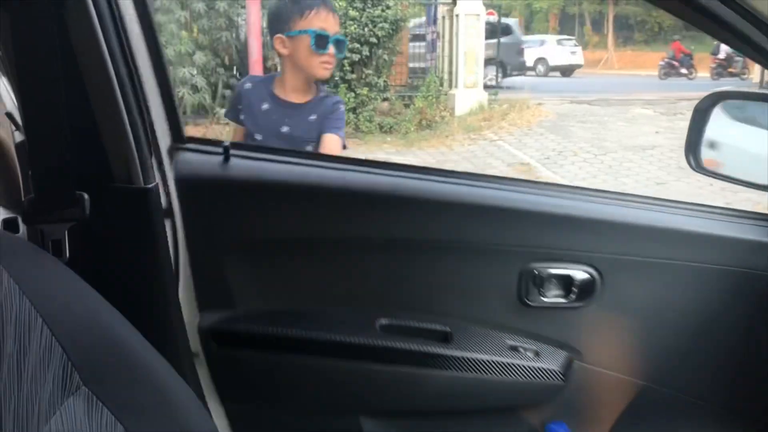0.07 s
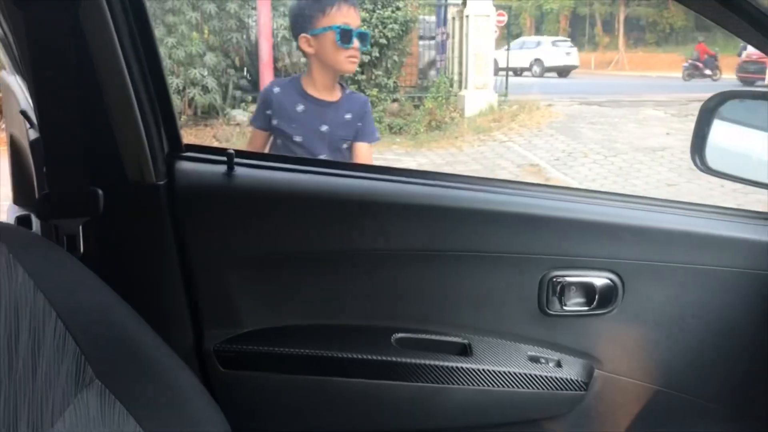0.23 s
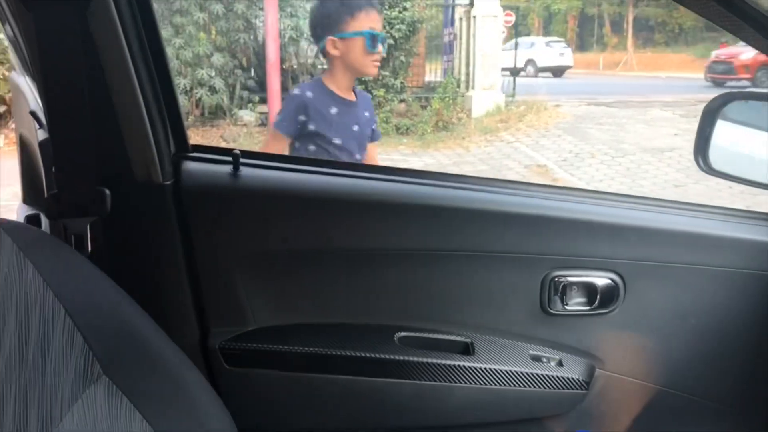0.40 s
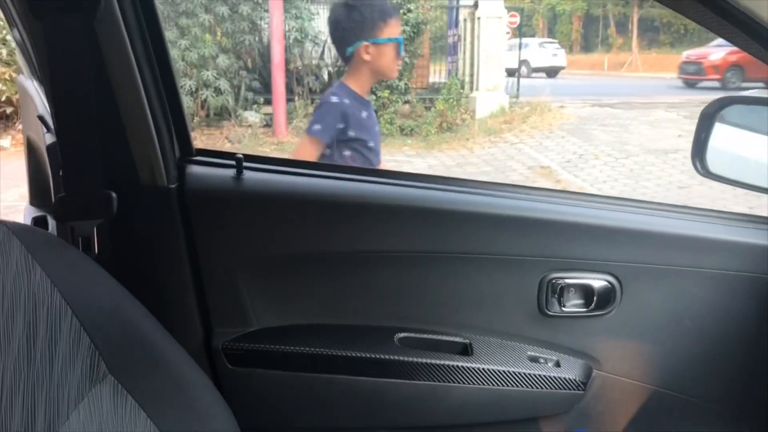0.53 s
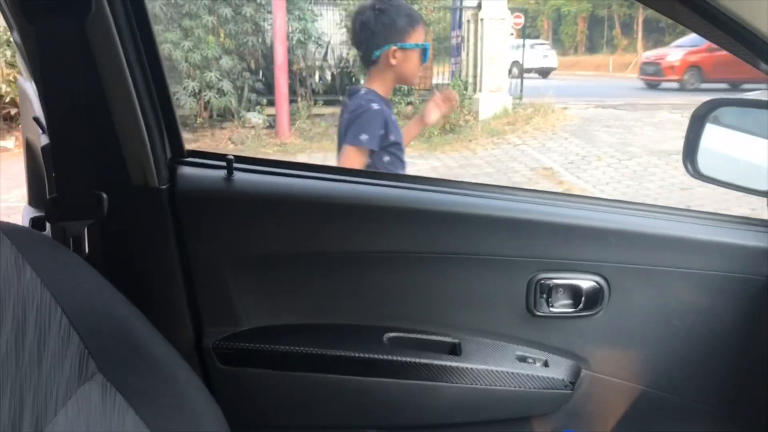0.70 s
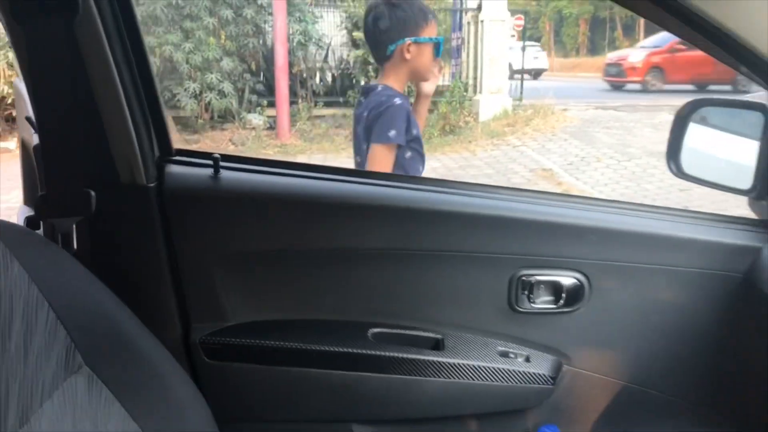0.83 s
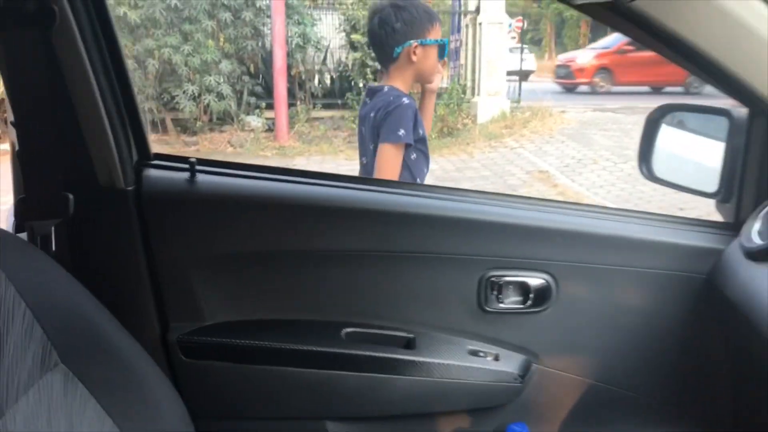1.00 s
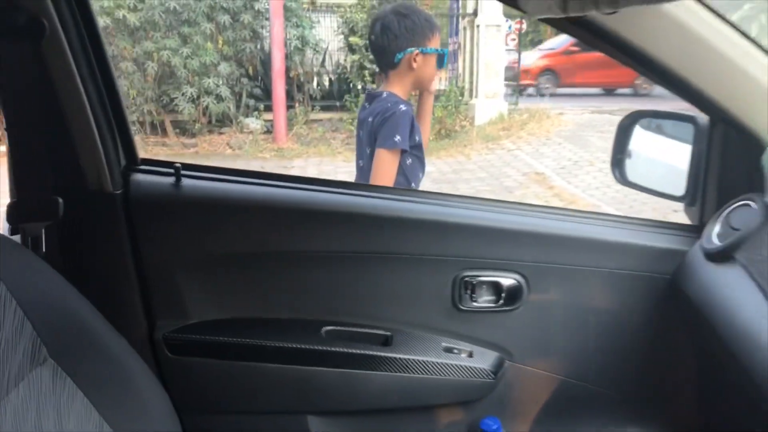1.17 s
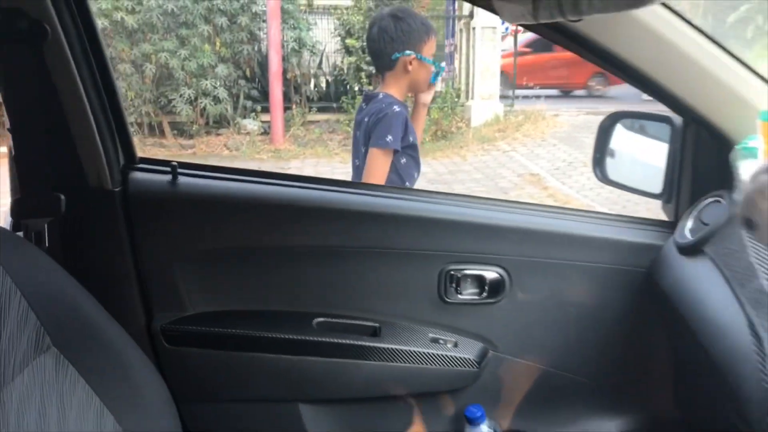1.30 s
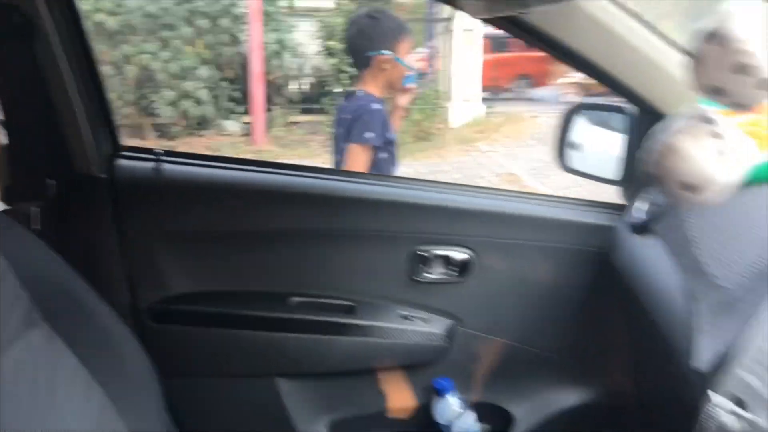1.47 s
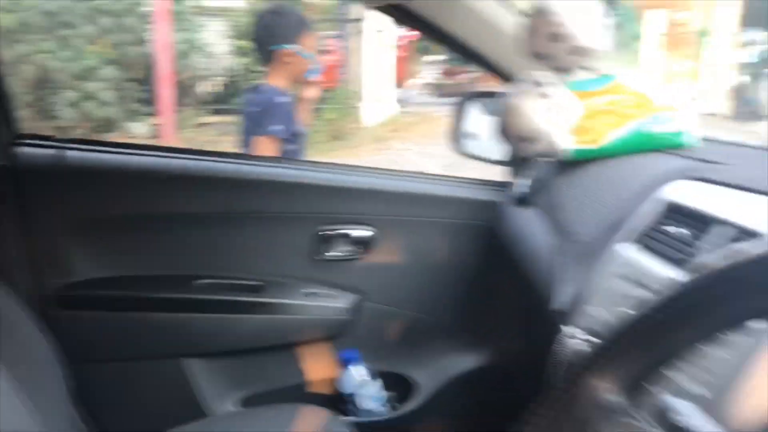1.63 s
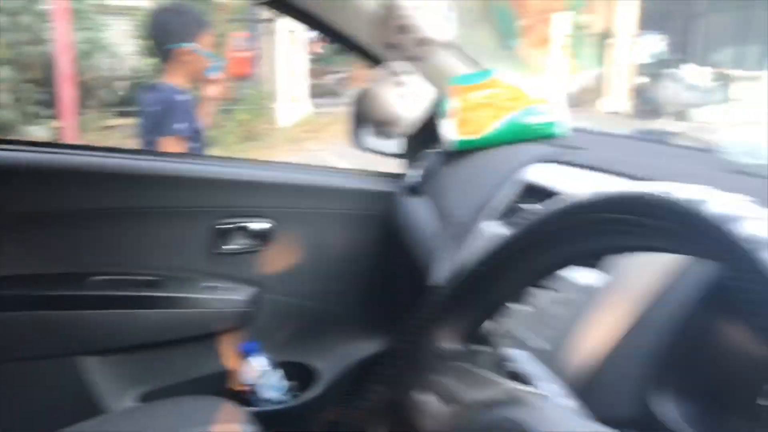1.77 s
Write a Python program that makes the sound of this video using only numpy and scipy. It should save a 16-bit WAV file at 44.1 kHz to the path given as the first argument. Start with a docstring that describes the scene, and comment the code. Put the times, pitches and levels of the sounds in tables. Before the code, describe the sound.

A car door is slammed hard, heard close from a seat inside: sharp latch crack, deep cabin boom and a tiny metallic rattle, then low road rumble and a few soft rustles, the microphone slightly overloaded.

```python
"""Heard from a seat inside a car: traffic rumble, drone, tyre roar and hiss, all shaped noise, come in
through the open window over a low body hum, a wavering sine. The door is slammed: seal, latch and rebounds
crack as noise bursts and ring the panel modes. The cabin air booms as a gliding sine with its octave,
a small metal part rattles in ticks of ringing modes, the hum swells and goes on, and a few soft noise
rustles follow. The microphone overloads softly."""
import sys
import numpy as np
from scipy import signal
from scipy.fft import rfft, irfft
from scipy.io import wavfile
from scipy.ndimage import uniform_filter1d

SR = 44100
rng = np.random.default_rng(int(sys.argv[2]) if len(sys.argv) > 2 else 0)


def master_out(mix):
    """Clip the mix to full scale and print it as 16-bit PCM to the path in sys.argv[1]."""
    frames = np.transpose(np.atleast_2d(mix))
    ceiling = np.clip(frames, -1, 1)
    pcm = np.round(ceiling * 32767).astype(np.int16)
    wavfile.write(sys.argv[1], SR, pcm)


def invert_db(level):
    """Linear amplitude ratio for a level in decibels (20 dB per decade), elementwise."""
    return 10 ** (np.asarray(level, dtype=float) / 20)


N = 81585
T = np.arange(N) / SR  # s


def evened(x):
    """Scales a signal to an rms of 1."""
    return x / np.sqrt(np.mean(x ** 2) + 1e-20)


def read(points, hz):
    """Reads a spectrum in dB at hz, straight between its points over log frequency."""
    point_hz, point_db = np.transpose(points)
    return np.interp(np.log(hz + 1), np.log(point_hz + 1), point_db)


def add(mix, start_s, sound):
    """Mixes a sound in at its start time, cut off at the end of the mix."""
    part = mix[round(start_s * SR):][:len(sound)]
    part += sound[:len(part)]


def patchy(points, patchy_db, swell_db, size=1024):
    """Noise of a given spectrum, with drifting patches in time and pitch and a flicker shared by all pitches."""
    frames, hz = 4 * N // size + 5, np.fft.rfftfreq(size, 1 / SR)
    real, imaginary, patches = rng.standard_normal((frames, len(hz), 3)).T
    swell = evened(uniform_filter1d(rng.standard_normal(frames), size=4))
    patches = uniform_filter1d(patches, size=10, axis=0)  # over frequency
    patches = evened(uniform_filter1d(patches, size=8, axis=1))  # over time
    level_db = read(points, hz)[:, None] + patchy_db * patches + swell_db * swell
    bins = (real + 1j * imaginary) * invert_db(level_db)
    noise = signal.istft(bins, nperseg=size, noverlap=size * 3 // 4)[1]
    return evened(noise[:N])


def burst(points, level_db, tilt_db, t60_s):
    """Coloured noise that rises in a moment and dies away exponentially; the tilt is per octave."""
    rise_s = 0.0021
    t, hz = np.arange(8192) / SR, np.fft.rfftfreq(8192, 1 / SR)
    colour = invert_db(read(points, hz) + tilt_db * np.log2((hz + 50) / 1000))
    noise = evened(irfft(rfft(rng.standard_normal(8192)) * colour))
    rise = np.minimum(t / rise_s, 1)
    return noise * rise * invert_db(level_db - 60 * t / t60_s)


def traffic():
    """Five bands of noise from the road, each with its own spectrum, flicker and course of level."""
    # course of the levels: start_s, deep_rumble_db, rumble_db, drone_db, tyre_roar_db, hiss_db
    course = [(0, -33, -44.5, -51, -51.5, -61.5), (.2, -32.5, -47, -47, -51.5, -63),
              (.45, -36.5, -45.5, -49, -53, -67), (0.602, -47, -50.5, -57.5, -60, -62.5),
              (.72, -48, -45, -51, -56, -62), (.8, -43, -40.5, -52.5, -53, -61),
              (.89, -42, -37.5, -48.5, -52, -54.5), (0.951, -40.5, -41, -49.5, -50, -62),
              (1.02, -58, -38, -49, -49, -53), (1.1, -31, -41, -48, -48, -53.5),
              (1.3, -46, -37.5, -44.5, -47.5, -51), (1.4, -48, -36, -42.5, -47.5, -51),
              (1.47, -43, -37, -45, -45.5, -52), (1.6, -37, -40, -45.5, -47, -53),
              (1.719, -48, -38.5, -44, -45.5, -58), (1.85, -38, -39.5, -43, -44.5, -58)]
    # relative spectra, rumble and drone as the cabin colours them: pitch_hz, level_db (per Hz)
    deep_spectrum = [(15, -37), (25, -25), (40, 1.5), (50, 21.5), (62, 6.5), (80, 10), (110, -49)]
    rumble_spectrum = [(40, -15), (62, 4.5), (78, 5), (100, -2), (118, 0.5), (135, 4.5), (155, -2),
                       (175, -7.5), (220, -39.5)]
    drone_spectrum = [(140, -5), (180, -1.5), (205, 2.5), (240, -1.5), (262, -7), (285, 2), (320, -5),
                      (365, -6.5), (420, -19), (520, -64)]
    roar_spectrum = [(210, -22), (350, -2), (467, -8.5), (572, -5), (756, -6.5), (1060, -4), (3500, -17.5),
                     (4550, -20), (7700, -120)]
    hiss_spectrum = [(1470, 2.5), (2500, 0.5), (4880, -1), (9360, -7.5), (10700, -32), (12400, -22),
                     (14500, -27), (15400, -26), (15900, -44)]
    start_s, *levels = np.transpose(course)
    layers = (
        patchy(deep_spectrum, 0, 0.41, size=4096),
        patchy(rumble_spectrum, 0.53, 0.47, size=4096),
        patchy(drone_spectrum, 1.0, 0.36, size=2048),
        patchy(roar_spectrum, 1.07, 0.19),
        patchy(hiss_spectrum, 3.0, 0.46, size=512),
    )
    return sum(invert_db(np.interp(T, start_s, level_db)) * layer for level_db, layer in zip(levels, layers))


def rustles():
    """Soft rustles in the cabin: dying bursts of noise."""
    # each rustle: start_s, level_db, t60_s
    events = [(1.012, -59, 0.059), (1.304, -39.5, 0.14), (1.411, -51, 0.046), (1.74, -48.5, 0.11)]
    # relative spectrum of a rustle: pitch_hz, level_db (per Hz)
    spectrum = [(250, -15.5), (400, 4), (800, 3.5), (1500, -6), (2200, -5), (3000, 0), (6000, -11),
                (10000, -17), (12000, -10), (15500, -26)]
    out = np.zeros(N)
    for start_s, level_db, t60_s in events:
        add(out, start_s, burst(spectrum, level_db, 0, t60_s))
    return out


def hum():
    """A low body mode, a sine of wavering pitch and level, goes on throughout and swells after the slam."""
    # course of the hum: start_s, pitch_hz, level_db (rms)
    course = [(0, 50.7, -31), (.17, 49.06, -39), (.23, 50.12, -56), (0.468, 49.23, -57), (0.499, 49.9, -29),
              (.56, 49.2, -25.5), (.63, 49.2, -28.5), (.70, 47.6, -32), (0.779, 49.7, -46.5),
              (.88, 49.9, -35), (0.981, 46.54, -36.5), (1.05, 50.1, -38), (1.2, 48.27, -45.5),
              (1.35, 47.2, -41), (1.5, 47.8, -42), (1.85, 49.3, -42)]
    start_s, pitch_hz, level_db = np.transpose(course)
    cycles = np.cumsum(np.interp(T, start_s, pitch_hz)) / SR + rng.random()
    return np.sqrt(2) * invert_db(np.interp(T, start_s, level_db)) * np.sin(2 * np.pi * cycles)


def rattle():
    """A loose metal part chatters: short runs of uneven touches ring the modes near one pitch most."""
    # each tick: start_s, level_db, length_s, spot_hz (the pitch that rings most)
    ticks = [(.301, -33, .022, 4630), (0.306, -34, .018, 13600), (.3645, -38, .005, 4670),
             (.3645, -33, .014, 13100), (.370, -42, .008, 8900), (0.375, -42, .012, 6200),
             (.395, -48, .010, 4160), (.396, -37.5, .010, 9700), (0.422, -40, .007, 3700),
             (0.424, -46.5, .012, 10500)]
    # modes of the metal part: pitch_hz, level_db (relative), t60_s
    metal = [(2008, -8, .02), (2794, -6, .02), (3600, -8, .02), (4660, 1, .035), (8457, 0, .025),
             (9017, -12, .02), (10100, -22, .03), (13090, 0, .035), (14490, -13, .03)]
    fall_db_per_octave = 13  # away from the spot
    chatter = .3  # size of the later touches against the first
    out, t = np.zeros(N), T[:4000]
    hz, mode_db, t60_s = np.transpose(metal)[:, :, None]
    for start_s, level_db, length_s, spot_hz in ticks:
        near_db = -fall_db_per_octave * abs(np.log2(hz / spot_hz))
        modes = invert_db(mode_db + near_db - 60 * t / t60_s) * np.sin(2 * np.pi * hz * t)
        touches = chatter * rng.standard_normal(2000)
        touches *= rng.random(2000) < .1  # about one sample in ten is touched
        touches *= T[:2000] < length_s
        touches[0] = 1
        add(out, start_s, invert_db(level_db) * signal.fftconvolve(touches, modes.sum(0)))
    return out


def boom():
    """The cabin air is pushed down first and swings at a gliding pitch, with its octave."""
    # course of the boom: start_s, pitch_hz, level_db (rms), octave_db (rms)
    course = [(0.2521, 56.7, -41, -45), (.259, 56.6, -7.5, -20), (0.267, 55.5, 1, -32),
              (0.301, 56.1, -14.5, -12), (0.311, 63.3, 0, -26.5), (0.323, 64.4, -17.5, -14),
              (0.341, 68.5, -5.5, -28), (0.357, 59.4, -18, -22), (.372, 56, -39, -41),
              (0.401, 54.4, -19.5, -24), (0.413, 53.65, -59, -40.5), (.435, 51.3, -23, -29.5),
              (.47, 50.4, -37, -53), (.49, 49, -43, -67)]
    start_s, pitch_hz, level_db, octave_db = np.transpose(course)
    started = T >= start_s[0]
    phase = 2 * np.pi * np.cumsum(started * np.interp(T, start_s, pitch_hz)) / SR
    peak = np.sqrt(2) * started * (T < start_s[-1])  # peak of a sine of rms 1
    swing = invert_db(np.interp(T, start_s, level_db)) * np.sin(phase)
    octave = invert_db(np.interp(T, start_s, octave_db)) * np.sin(2 * phase)
    return -peak * (swing + octave)


def door():
    """Seal, latch and rebounds: each contact cracks, knocks the panel modes and shakes them briefly."""
    # contacts of the door: start_s, crack_db, tilt_db (brightness per octave), t60_s, panel_db
    contacts = [(.230, -24, -5, 0.089, -19), (.238, -24, -5, .1, -4), (0.2438, -8.5, -1.5, 0.13, -2),
                (0.251, -4, -9, 0.035, -13.5), (.270, -12, 2, 0.038, -11.5), (0.276, -17, 0.5, 0.17, -10.5),
                (0.294, -15.5, -0.5, 0.093, -10), (0.313, -29.5, -10.5, 0.27, -30.5),
                (.330, -24, -3, 0.11, -17.5), (0.364, -34.5, -2.5, 0.12, -38),
                (.396, -35, -1.5, 0.099, -41), (0.423, -35.5, -3.5, 0.051, -41),
                (0.446, -51.5, -1.5, 0.19, -46.5), (0.473, -50, -2, 0.057, -46),
                (.515, -61, -13, 0.061, -49), (.549, -75, -5, 0.051, -65)]
    # relative spectrum of a crack: pitch_hz, level_db (per Hz)
    crack_spectrum = [(150, -59), (320, -12.5), (440, -22), (900, -10), (1300, -14.5), (1650, -16.5),
                      (2500, -16.5), (5150, -23), (7000, -25), (16000, -34.5)]
    # door panel modes: pitch_hz, level_db (relative), t60_s
    panel = [(80, -0.5, 0.16), (98.6, 1.5, 0.31), (169.4, 1, 0.051), (182, -1, 0.14), (235.7, -2, 0.17),
             (268, 2, 0.12), (308.4, -3.5, 0.23), (336, 1.5, .09), (552.3, -16, 0.094), (590, -10, 0.077),
             (765, -3, 0.057), (905, -3.5, 0.045), (1051, -2, 0.046), (1198, 0, 0.033),
             (1950, -14.5, 0.087), (2580, -22, .05)]
    knock_db, shake_t60_s = 20.5, 0.062  # the knock is one sample, over the start of the shake
    cracks, drive, t = np.zeros(N), np.zeros(N), T[:12000]
    for start_s, crack_db, tilt_db, t60_s, panel_db in contacts:
        add(cracks, start_s, burst(crack_spectrum, crack_db, tilt_db, t60_s))
        shake = rng.standard_normal(len(t)) * invert_db(-60 * t / shake_t60_s)
        shake[0] = invert_db(knock_db)
        add(drive, start_s, invert_db(panel_db) * shake)
    ring = np.zeros(len(t))
    for k, (hz, mode_db, t60_s) in enumerate(panel):
        sign = (-1) ** k  # neighbouring modes start in opposite directions
        ring += sign * invert_db(mode_db - 60 * t / t60_s) * np.sin(2 * np.pi * hz * t)
    return cracks + signal.oaconvolve(drive, ring / np.linalg.norm(ring))[:N]


def scene():
    """Everything as it sums at the seat, in one channel."""
    return (traffic() + rustles() + hum() + rattle() + boom() + door())[None]


def low_pass(x):
    """Removes everything above the highest recorded frequency."""
    return signal.sosfilt(signal.butter(12, 16510, fs=SR, output="sos"), x)


def record(dry):
    """The microphone cuts the lowest bass, overloads softly towards a ceiling and is limited in treble."""
    low_cut_hz, edge_hz = 24, 16100
    ceiling, knee = 1.02, 3.5  # a higher knee bends later and more sharply
    x = signal.lfilter(*signal.butter(2, low_cut_hz, "high", fs=SR), dry)
    x = x / (1 + abs(x / ceiling) ** knee) ** (1 / knee)
    treble_limit = signal.firwin(511, edge_hz, window=("kaiser", 9), fs=SR)
    mix = signal.oaconvolve(x, treble_limit[None], "same")
    return low_pass(mix)


dry = scene()
out = record(dry)
master_out(out)
```